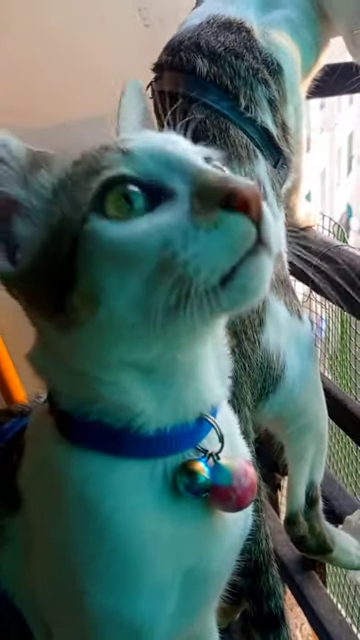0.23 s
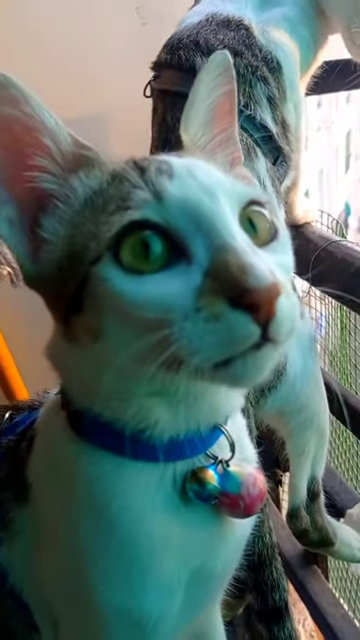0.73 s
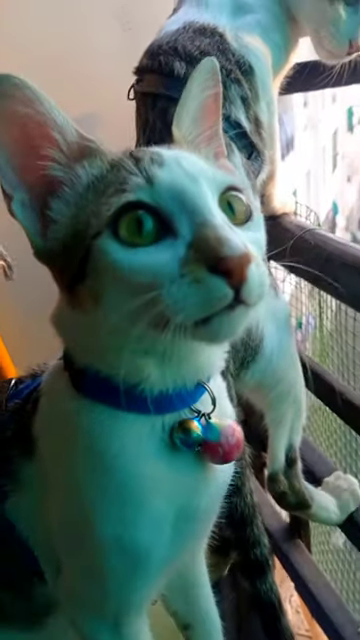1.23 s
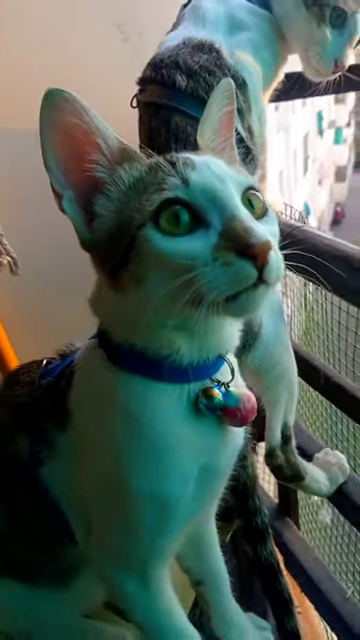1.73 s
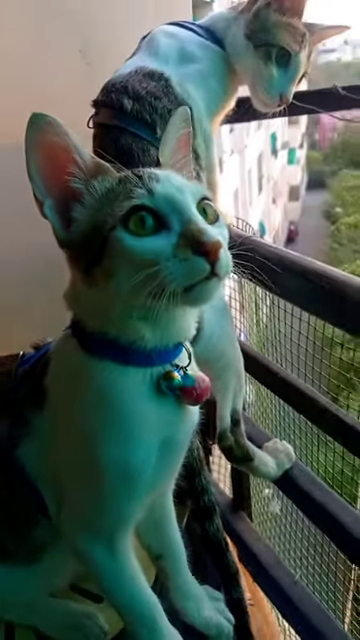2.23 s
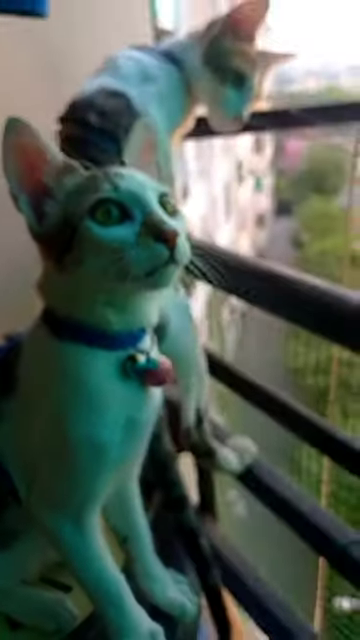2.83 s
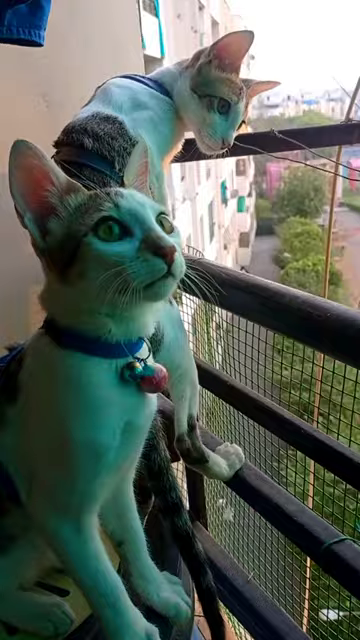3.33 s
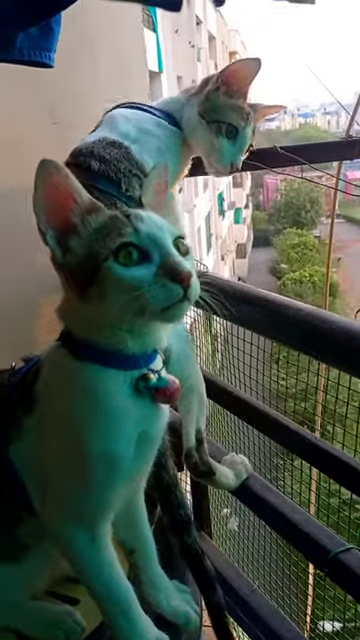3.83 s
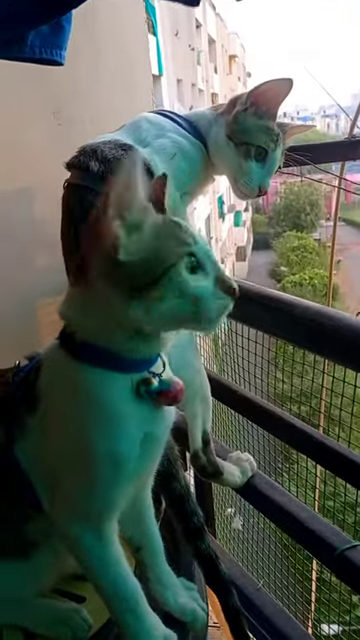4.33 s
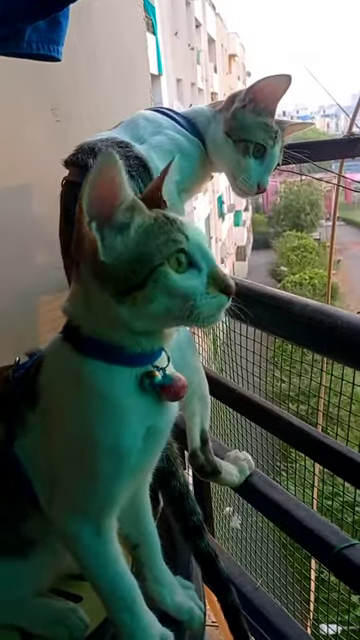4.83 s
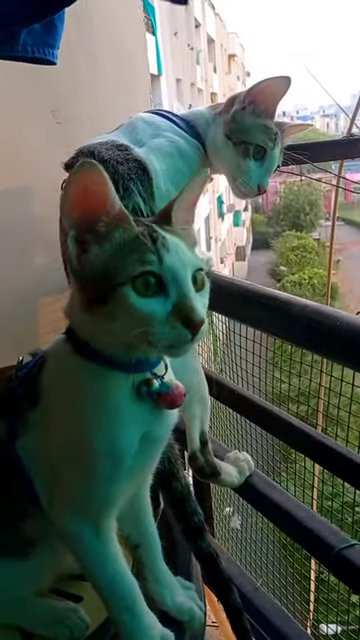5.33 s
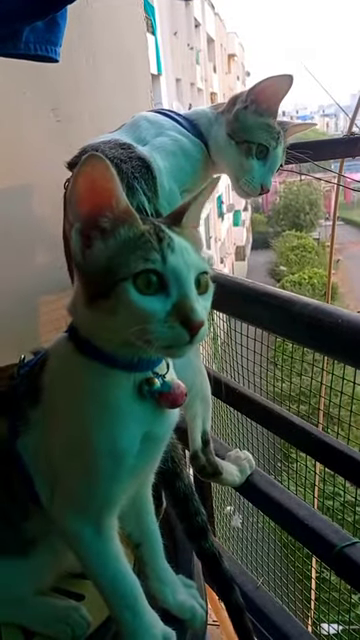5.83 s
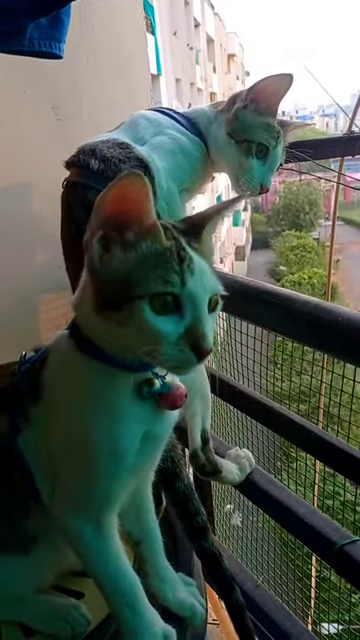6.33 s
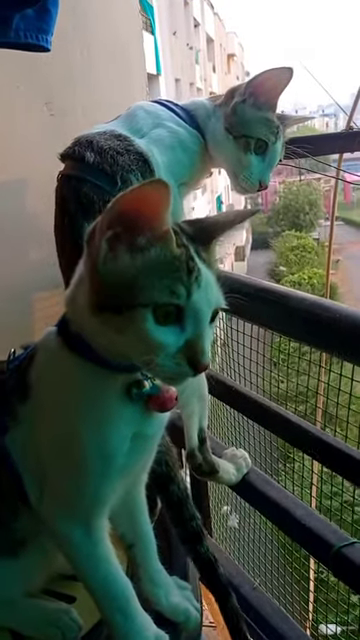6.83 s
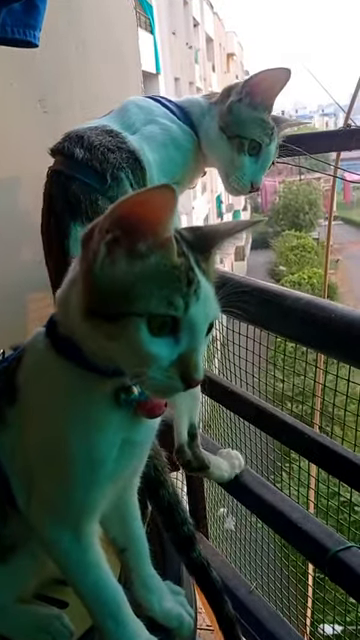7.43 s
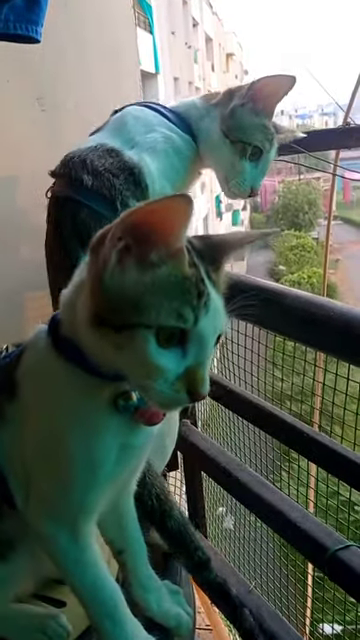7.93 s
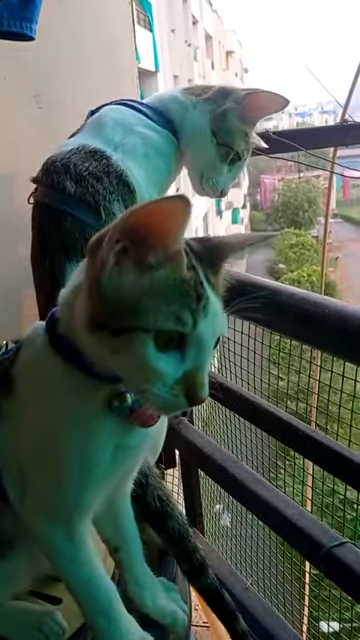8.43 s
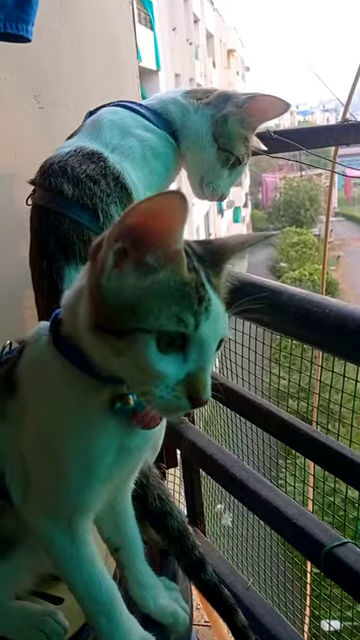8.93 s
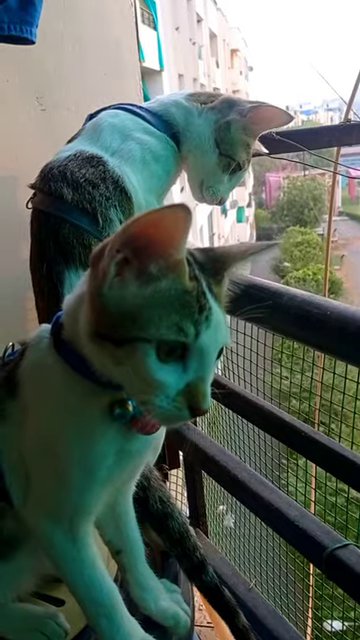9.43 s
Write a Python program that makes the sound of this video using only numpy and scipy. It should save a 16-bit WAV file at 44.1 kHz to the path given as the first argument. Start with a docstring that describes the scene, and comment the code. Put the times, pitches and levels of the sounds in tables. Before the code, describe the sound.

A lively outdoor bird chorus heard from a balcony, the two cats there silent. High paired ticks run steadily, with buzzy slurs far off, sparrow chirps in front and soft, throaty dove coos led in by small clucks. Piping gathers before a single wooden-sounding thud and rattle near the middle. Later come whistles, rasping chews and faint hoarse caws, over low traffic and patchy hiss, with sparse wall echoes.

```python
"""Birds around a high balcony

Between apartment blocks sparrows chirp close by in trilled tones, small birds tick, whistle and pipe in
bent tones, and a dove gives low falling coos. Slurs, cheeps, a pulsed crow and toots come from afar.
Something knocks once on the balcony, as ringing modes and noise; coloured noise makes the town below
and a patchy high hiss. Walls and facades return the calls as sparse echoes."""
import sys
import numpy as np
from scipy import signal
from scipy.fft import rfft, irfft
from scipy.io import wavfile
from scipy.ndimage import uniform_filter1d, map_coordinates

SR = 44100
rng = np.random.default_rng(int(sys.argv[2]) if len(sys.argv) > 2 else 0)


def generate_wav(sig):
    """Save sig (samples, or channels by samples) to the path in sys.argv[1] as 16-bit PCM at SR."""
    pcm = np.round(np.clip(np.atleast_2d(sig).T, -1, 1) * 32767).astype(np.int16)
    wavfile.write(sys.argv[1], SR, pcm)


N = 426888
TIME = np.arange(N) / SR


def from_db(db):
    """Decibels to gain."""
    return 10 ** (np.asarray(db) / 20)


def rms_one(x):
    """Scale to unit power."""
    return x / np.sqrt(np.mean(x ** 2) + 1e-20)


def add(out, start_s, sound):
    """Mix a sound in at a start time."""
    i = int(start_s * SR)
    out[i:i + len(sound)] += sound[:max(N - i, 0)]


def wander(size, rate_hz):
    """Smooth random curve through normal knots, rate_hz of them a second."""
    knots = rng.standard_normal(4096)
    return map_coordinates(knots, [np.arange(size) * rate_hz / SR], order=3, mode="wrap")


def noise(spectrum):
    """Unit-power noise coloured by rows of (Hz, dB per Hz), interpolated over log frequency."""
    hz, db = np.transpose(spectrum)
    bins_hz = np.arange(N // 2 + 1) * SR / N + 1e-6
    gain = from_db(np.interp(np.log(bins_hz), np.log(hz), db))
    return rms_one(irfft(rfft(rng.standard_normal(N)) * gain, N))


def patchy(x, depth_db, width_hz, rate_hz):
    """Every narrow band swells and fades on its own; unit power."""
    hz, t, frames = signal.stft(x, SR, nperseg=512)
    grid = np.meshgrid(hz / width_hz, t * rate_hz, indexing="ij")
    field = map_coordinates(rng.standard_normal((256, 1024)), grid, order=3, mode="wrap")
    gain = from_db(depth_db * np.tanh(field / 2) * 2)
    return rms_one(signal.istft(frames * gain, SR, nperseg=512)[1][:N])


def resonate(x, hz, width_hz):
    """Two-pole resonance with unit gain at its peak."""
    r = np.exp(-np.pi * width_hz / SR)
    zeros = np.array([1, 0, -1]) * (1 - r * r) / 2
    poles = [1, -2 * r * np.cos(2 * np.pi * hz / SR), r * r]
    return signal.lfilter(zeros, poles, x + 1e-18)


def dying(rows, t60_s):
    """Envelope that jumps at each (start s, dB) and decays exponentially."""
    kicks = np.zeros(N)
    for start_s, db in rows:
        add(kicks, start_s, from_db([db]))
    return signal.lfilter([1], [1, -from_db(-60 / (t60_s * SR))], kicks + 1e-18)


def syrinx(hz, db, overtone_db):
    """Nearly pure tone with a weak octave and soft ends, as from a bird's syrinx."""
    phase = 2 * np.pi * np.cumsum(hz) / SR
    ends = signal.windows.tukey(len(hz), min(1, .006 * SR / len(hz)))  # 3 ms each
    octave = from_db(overtone_db) * np.sin(2 * phase) * (hz < SR / 4)  # none above Nyquist
    return np.sqrt(2) * ends * from_db(db) * (np.sin(phase) + octave)


def bend(size, start, end, turn, bow):
    """Pitch ratio from start to 1 at the share turn, then to end; bow above 1 lingers at the turn."""
    u = np.linspace(0, 1, size)
    distance = np.interp(u, [0, turn, 1], [1, 0, 1]) ** bow
    return 1 + (np.where(u < turn, start, end) - 1) * distance


def note(length_s, hz, db, start=1, end=1, turn=0.69, bow=1, edge_db=0,
         waver=0, waver_hz=180, overtone_db=-60):
    """Tone along a bend with random pitch waver; edge_db is its ends relative to its middle."""
    size = int(length_s * SR)
    pitch_hz = hz * bend(size, start, end, turn, bow) * (1 + waver * wander(size, waver_hz))
    return syrinx(pitch_hz, db + edge_db * np.linspace(-1, 1, size) ** 2, overtone_db)


def sing(rows, **manner):
    """Notes of one kind from rows of (start s, length s, Hz, dB)."""
    out = np.zeros(N)
    for start_s, length_s, hz, db in rows:
        add(out, start_s, note(length_s, hz, db, **manner))
    return out


def trilled(length_s, hz, db, shape, trill_hz, jitter, overtone_db, depth_scale=1):
    """Tone following (share, pitch ratio, dB, trill depth); its uneven trill also breaks up the level."""
    size = int(length_s * SR)
    share, *columns = np.transpose(shape)
    u = np.linspace(0, 1, size)
    ratio, level_db, depth = (uniform_filter1d(np.interp(u, share, c), size=120) for c in columns)
    depth = depth * depth_scale
    trill = np.sin(2 * np.pi * np.cumsum(trill_hz * (1 + 0.187 * wander(size, 150))) / SR)
    pitch_hz = hz * ratio * (1 + depth * (trill + jitter * wander(size, 900)))
    breakup_db = 17.5 * depth * wander(size, 498.6)  # deeper trill, more broken voice
    return syrinx(pitch_hz, db + level_db + breakup_db, overtone_db)


def engines():
    """Deep drone of vehicles: low coloured noise that comes and goes."""
    # Each row: frequency in Hz, relative level in dB per Hz.
    engine_colour = [(30, -54), (60, 7.5), (90, 17.5), (135, 18.5), (180, 3), (300, -44.5)]
    # Each row: time in seconds, relative level in dB.
    engine_level = [(0, -49), (1.3, -46.5), (3.8, -55), (4.9, -53), (8.2, -55), (9.68, -53)]
    return from_db(np.interp(TIME, *np.transpose(engine_level)) + 3.0) * noise(engine_colour)


def town(town_db, hum_db, hum_hz):
    """Patchy traffic rumble and a machine drone of resonant noise."""
    # Each row: frequency in Hz, relative level in dB per Hz.
    rumble_colour = [(25, -60.5), (45, -40.5), (80, -23.5), (130, -3.5), (200, 0), (300, -2.5), (440, -3.5),
                     (800, -15.5), (1600, -23.5), (2200, -31), (4000, -39), (6500, -57), (8500, -59),
                     (11000, -67.5), (15000, -62)]
    rumble = from_db(town_db) * patchy(noise(rumble_colour), depth_db=4.0, width_hz=131.6, rate_hz=12)
    hum = resonate(resonate(rng.standard_normal(N), hum_hz, 19.6), hum_hz, 19.6)
    return rumble + from_db(hum_db) * rms_one(hum)


def patchy_hiss(level_db):
    """Patchy, flickering hiss in the birds' range: coloured noise that swells and fades."""
    # Each row: frequency in Hz, relative level in dB per Hz.
    hiss_colour = [(1800, -1.5), (2700, 1.5), (4200, 6.5), (6200, 1), (7300, -10.5), (8800, -22.5),
                   (10000, -51)]
    # Each row: time in seconds, relative level in dB.
    hiss_level = [(0, -57), (.25, -64.5), (.65, -70.5), (1.0, -56.5), (1.45, -60), (1.9, -51.5),
                  (2.6, -60.5), (3.05, -52), (3.4, -60.5), (4.2, -50.5), (4.8, -59.5), (5.3, -53.5),
                  (5.8, -58.5), (6.9, -53), (7.75, -50), (8.1, -57), (8.45, -61), (9.0, -59), (9.3, -46.5),
                  (9.52, -57), (9.68, -41.5)]
    hiss = patchy(noise(hiss_colour), depth_db=7.5, width_hz=310.0, rate_hz=22)
    return from_db(level_db + np.interp(TIME, *np.transpose(hiss_level))) * hiss


def horns():
    """Thin, unsteady toots far down the street."""
    # Each row: start in seconds, length in seconds, pitch in Hz, relative level in dB.
    toots = [(1.47, 0.037, 1243, -51), (4.3, 0.67, 1145, -60.5), (5.05, .7, 1185, -67)]
    return sing(toots, waver=0.035, waver_hz=90)


def crow():
    """Far caws: hoarse pulses at an unsteady rate through two throat resonances."""
    # Each row: start in seconds, length in seconds, relative level in dB.
    caws = [(7.009, 0.42, -59), (7.674, 0.4, -60), (8.307, 0.35, -61), (8.972, 0.45, -57)]
    # Each row: frequency in Hz, width in Hz, relative level in dB.
    throat = [(1400, 380, 11), (1620, 310, 15)]
    out = np.zeros(N)
    for start_s, length_s, db in caws:
        size = int(length_s * SR)
        arch = np.sin(np.linspace(0, np.pi, size)).clip(0)
        cycles = np.cumsum(400 * (1 + 0.14 * arch + 0.0854 * wander(size, 400))) / SR
        pulses = np.diff(np.floor(cycles), prepend=0)
        voice = sum(from_db(level_db) * resonate(resonate(pulses, hz, width_hz), hz, width_hz)
                    for hz, width_hz, level_db in throat)
        add(out, start_s, from_db(db) * rms_one(voice * np.sqrt(arch)))
    return out


def slurs(voice_db, rasp_db):
    """Buzzy falling slurs of birds farther off: a trilled voice with a raspy second one around it."""
    # Each row: start in seconds, length in seconds, reference pitch in Hz, relative level in dB.
    slur_rows = [(0.301, 0.11, 2950, -60.5), (0.603, 0.12, 2690, -65.5), (0.846, 0.12, 2610, -57.5),
                 (0.986, 0.12, 3600, -48), (1.793, 0.13, 3700, -48), (2.321, 0.093, 2730, -65),
                 (2.508, 0.12, 3640, -47), (3.174, 0.12, 3603, -44.5), (4.148, 0.11, 3590, -46),
                 (4.616, 0.039, 2234, -50.5), (5.297, 0.13, 3270, -56.5), (5.642, 0.19, 4050, -58.5),
                 (7.578, 0.083, 3390, -52), (8.69, 0.061, 2186, -57.5), (8.992, 0.054, 3080, -60.5)]
    # Each row: share of length, pitch ratio, relative level in dB, trill depth as share of pitch.
    slur_shape = [(0, 1.06, -3, .01), (.08, 1.24, 0, .012), (.25, 1.1, 2, .03), (.45, 1.03, 0, .06),
                  (.68, .89, -1, .045), (.86, .86, 1, .02), (1, .8, -7, .02)]
    out = from_db(rasp_db) * sing(slur_rows, end=0.66, turn=0.28, edge_db=-11.0, waver=0.13, waver_hz=270)
    for start_s, length_s, hz, db in slur_rows:
        add(out, start_s, trilled(length_s, hz, db + voice_db, slur_shape, trill_hz=124.4,
                                  jitter=0.83, overtone_db=-47))
    return out


def cheepers():
    """Thin, faint cheeps from the trees: short tones with wavering pitch and soft edges."""
    # Each row: start in seconds, length in seconds, pitch in Hz, relative level in dB.
    cheeps = [(.315, 0.038, 7100, -62), (.41, 0.022, 7350, -60), (.712, .02, 5900, -58),
              (.775, 0.027, 6500, -54.5), (.78, .04, 4470, -54), (.9, 0.021, 5870, -59),
              (3.45, 0.047, 4680, -54), (3.57, 0.057, 6230, -54.5), (4.27, .04, 6350, -60),
              (4.61, 0.052, 6480, -42.5), (4.96, 0.075, 5550, -43), (7.56, .05, 6260, -38),
              (7.72, 0.025, 4780, -55), (7.845, 0.038, 5670, -59), (8.165, 0.037, 6770, -56),
              (8.3, 0.039, 6270, -53), (9.22, 0.12, 5430, -50)]
    return sing(cheeps, start=.9, end=0.98, turn=.5, edge_db=-10.5, waver=.045, waver_hz=130)


def small_noises():
    """Tiny clicks and one soft brush close by, both enveloped coloured noise."""
    # Each row: start in seconds, relative level in dB.
    click_rows = [(.512, -63), (1.305, -43), (2.28, -62), (7.524, -58), (7.666, -53)]
    peak_s, peak_db, swell_db_per_s, fade_db_per_s = 1.67, -42, 184, 346
    brush_db = peak_db - np.maximum(swell_db_per_s * (peak_s - TIME), fade_db_per_s * (TIME - peak_s))
    brush = from_db(brush_db) * noise([(500, -10), (3000, 7), (7000, 16), (10000, -7), (15000, -10)])
    clicks = dying(click_rows, t60_s=0.039) * noise([(500, -15.0), (3000, -6.0), (8000, 10), (15000, -13)])
    return clicks + brush


def knock(ring_db, crack_db, crack_t60_s):
    """A dull blow and its rattle: noise bursts and decaying modes of the struck body."""
    # Each row: start in seconds, relative strength in dB.
    blows = [(4.047, -4.5), (4.081, 9), (4.086, -6.5), (4.107, -28)]
    # Each row: frequency in Hz, relative level in dB, 60 dB decay time in seconds.
    modes = [(217, -20.5, 0.79), (444, -17, 0.15), (695, -8.5, 0.13), (950, -30.5, 0.41), (1120, -13, 0.18),
             (1270, -25, 0.056), (1730, -6.5, 0.025), (2420, -21, .08), (2760, -19, 0.072)]
    # Each row: frequency in Hz, relative level in dB per Hz.
    crack_colour = [(71, -42), (120, -19), (418, -3), (633, -22), (706, -9.5), (1210, -13), (1460, -9.5),
                    (1840, -21.5), (2890, -23.5), (6530, -39.5), (9040, -49.5), (11800, -68), (19900, -120)]
    out, t = np.zeros(N), TIME[:SR // 2]
    for start_s, db in blows:
        for hz, level_db, t60_s in modes:
            decay_db = ring_db + db + level_db + rng.normal(0, 1.2) - 60 * t / t60_s
            add(out, start_s, from_db(decay_db) * np.sin(2 * np.pi * hz * t) * rng.choice([-1, 1]))
    return out + from_db(crack_db) * dying(blows, crack_t60_s) * noise(crack_colour)


def pipers():
    """Clean lower tones that hold, lift, sag or glide down; their level flickers."""
    # Each row of the four: start in seconds, length in seconds, pitch in Hz, relative level in dB.
    pipes = [(3.21, 0.066, 3070, -49.5), (3.362, 0.072, 3055, -47.5), (3.565, 0.063, 3050, -46),
             (3.705, 0.053, 3040, -46.5), (3.79, 0.052, 2586, -48), (3.928, 0.071, 2988, -44),
             (4.315, 0.06, 2980, -41.5), (4.46, 0.08, 2944, -47.5), (9.33, 0.074, 2685, -57),
             (9.49, 0.036, 3300, -52)]  # level piping
    lifts = [(2.76, 0.07, 3620, -51.5), (3.132, 0.058, 3580, -47.5), (3.535, 0.052, 3560, -47),
             (8.47, 0.04, 2625, -54.5)]  # lift into their pitch
    sags = [(2.523, 0.038, 2390, -48.5), (3.62, 0.08, 2570, -47), (4.0, 0.11, 2496, -51),
            (4.385, 0.052, 2540, -47), (8.822, 0.048, 2367, -47)]  # fall, linger in the middle, then fall again
    glides = [(1.87, 0.071, 2580, -62), (2.36, .11, 2430, -62.5), (2.83, 0.047, 2520, -53.5),
              (2.865, 0.082, 2630, -54), (3.205, 0.09, 2250, -53.5), (9.6, 0.08, 2910, -56)]  # thin, falling
    notes = sing(pipes, start=0.99, end=0.97, bow=1.46, edge_db=-4, waver=0.005)
    notes += sing(lifts, start=.87, end=1.04, bow=1.2, edge_db=-10.5, waver=0.012)
    notes += sing(sags, start=1.07, end=0.93, turn=0.45, bow=2.3, edge_db=4, waver=0.0043)
    notes += sing(glides, start=1.17, end=0.77, edge_db=5, waver=0.024)
    return notes * from_db(4 * (wander(N, 70) - 1))


def whistlers():
    """Thin high bent tones: rises that end in a quick flick down from above, and arched peeps."""
    # Each row of both: start in seconds, length in seconds, pitch in Hz, relative level in dB.
    rises = [(1.604, 0.071, 4800, -48.5), (2.297, 0.053, 4740, -46), (2.582, 0.086, 4590, -52),
             (7.099, 0.078, 4880, -48), (7.311, 0.061, 4870, -46.5), (7.476, 0.067, 5380, -48.5),
             (9.218, 0.086, 5600, -48.5)]
    peeps = [(1.35, 0.028, 5900, -50), (1.505, 0.027, 5680, -51), (2.003, 0.033, 6230, -48),
             (2.2, 0.014, 5730, -42.5), (5.915, 0.032, 6400, -51.5), (6.72, 0.02, 6190, -51),
             (6.83, 0.042, 6060, -50), (9.59, 0.043, 5970, -50.5)]
    gap_s, flick_s, flick_hz, flick_db = 0.017, 0.035, 6020, 0.5
    flicks = [(start_s + length_s + gap_s, flick_s, flick_hz, db + flick_db)
              for start_s, length_s, hz, db in rises]
    out = sing(rises, start=.88, end=1.13, edge_db=0.5, waver=0.0042)
    out += sing(flicks, start=1.14, end=0.23, edge_db=-27, waver=0.034)
    return out + sing(peeps, start=0.85, end=0.55, bow=3.8, edge_db=7, waver=0.035)


def tick(top_hz, db, stretch):
    """Pitch whip up by about an octave, a moment on top, a fall and a short rest below."""
    low_hz, rise_s, hold_s, fall_s, rest_s = 3888, .007, 0.0053, 0.0087, 0.004  # times before stretch
    corners_s = stretch * np.cumsum([0, rise_s, hold_s, fall_s, rest_s])
    t = np.arange(0, corners_s[-1], 1 / SR)
    height = uniform_filter1d(np.interp(t, corners_s, [0, 1, 1, 0, 0]), size=100)
    hz = (low_hz + (top_hz - low_hz) * height) * (1 + 0.02 * wander(len(height), 386))
    sweep_db = -4.5 * np.sin(np.pi * height)  # softer while the pitch moves
    return syrinx(hz, db + sweep_db + 3.8 * wander(len(height), 484), overtone_db=-49)


def ticker(snap_db):
    """Sharp ticks of varied length: a noise snap and a rough low voice open each, then the whip follows."""
    # Each row: start in seconds, top pitch in Hz, relative level in dB.
    tick_rows = [(0.06, 8320, -30.5), (0.5, 8800, -33.5), (1.096, 8920, -34), (1.195, 8100, -33),
                 (1.615, 8880, -34), (1.705, 7730, -32.5), (2.175, 8950, -32), (2.27, 7900, -34.5),
                 (2.686, 9260, -33.5), (3.093, 8970, -31), (3.196, 7860, -31.5), (3.752, 8600, -30.5),
                 (3.846, 7740, -32), (4.335, 8280, -32), (4.415, 7700, -30), (4.907, 8570, -32),
                 (4.985, 7930, -32), (5.084, 7640, -32), (5.382, 8300, -31.5), (5.451, 7760, -30),
                 (5.95, 8820, -32), (6.346, 8070, -32), (6.42, 7700, -30.5), (6.854, 8160, -26),
                 (6.919, 7700, -27), (6.984, 7420, -26.5), (7.38, 7740, -30), (7.446, 7670, -27.5),
                 (7.976, 7760, -33.5), (8.039, 7600, -31.5), (8.573, 8470, -41), (8.654, 7800, -33.5),
                 (9.111, 8500, -38.5), (9.19, 7650, -30.5)]
    # Each row: frequency in Hz, relative level in dB per Hz.
    snap_colour = [(1000, -30), (2500, -2), (4200, 2.5), (8000, -2.5), (10000, -24), (15000, -40)]
    whip_delay_s, undertone_s, undertone_hz, undertone_db = 0.0026, .013, 3680, -2
    out = np.zeros(N)
    for start_s, top_hz, db in tick_rows:
        add(out, start_s + whip_delay_s, tick(top_hz, db, stretch=rng.uniform(.85, 1.15)))
        low_hz = undertone_hz * rng.uniform(.94, 1.2)
        add(out, start_s, note(undertone_s, low_hz, db + undertone_db, edge_db=6, waver=0.071, waver_hz=760))
    snaps = dying([(start_s, db) for start_s, _, db in tick_rows], t60_s=0.068) * noise(snap_colour)
    return out + from_db(snap_db) * signal.sosfilt(signal.butter(4, 7000, fs=SR, output="sos"), snaps)


def dove():
    """Falling coos: smooth ones quaver in pitch and level, rough ones flutter; clucks lead most in."""
    # Each row: start in seconds, length in seconds, start, middle and end pitch in Hz, bow (1 falls
    # straight, more lingers in the middle), relative level in dB, roughness (about 0-1), attack in
    # seconds, swell of the middle over the ends in dB.
    coo_rows = [(0.39, 0.48, 562.4, 359.8, 286.4, 3.2, -21, 0.18, 0.086, 4.5),
                (2.329, 0.47, 503.7, 371.5, 256.5, 1.82, -23, 0.4, 0.017, 4.5),
                (4.269, 0.45, 442.7, 352.2, 250, 2.08, -25.5, 0.2, 0.034, 2.5),
                (6.185, .43, 550.6, 409.8, 295.3, 1.05, -19.5, 0.55, 0.015, 6.5),
                (8.405, 0.41, 455.4, 404.6, 301, 1.19, -24.5, 1.03, 0.078, 3)]
    # Brief level dips. Each row: time in seconds, half width in seconds, depth in dB.
    level_dips = [(.497, 0.021, -21), (2.591, 0.016, -19), (2.69, 0.02, -9)]
    # Each row: start in seconds, length in seconds, pitch in Hz, relative level in dB.
    clucks = [(0.138, 0.022, 334, -27.5), (1.811, 0.029, 445, -34.5), (2.098, 0.033, 345, -30),
              (4.006, 0.026, 406, -26), (4.102, 0.039, 419, -29.5), (5.619, 0.031, 446, -37.5),
              (5.909, 0.017, 327, -27.5), (5.99, 0.026, 376, -29.5)]
    release_s, edge_db, flutter_hz = 0.061, -7.5, 41.65
    quaver_period_s, quaver_peak_s, quaver_depth, quaver_db = 0.1404, 0.2476, 0.019, -1.5
    split_roughness, split_ratio, split_db = 0.54, 1.21, 5
    out = np.zeros(N)
    for (start_s, length_s, start_hz, middle_hz, end_hz, bow, db,
         roughness, attack_s, swell_db) in coo_rows:
        t = np.arange(0, length_s, 1 / SR)
        size = len(t)
        edges_db = edge_db * np.maximum(1 - t / attack_s, 1 - (length_s - t) / release_s).clip(0)
        rough = roughness * (1 - 0.76 * np.linspace(-1, 1, size) ** 2)  # most in the middle
        quaver = (1 - roughness) * np.cos(2 * np.pi * (t - quaver_peak_s) / quaver_period_s)
        flutter = np.sin(2 * np.pi * np.cumsum(flutter_hz * (1 + 0.259 * wander(size, 34.6))) / SR)
        hz = middle_hz * bend(size, start_hz / middle_hz, end_hz / middle_hz, turn=.48, bow=bow)
        hz = hz * (1 + quaver_depth * quaver + 0.11 * rough * wander(size, 128.8))
        arch_db = -swell_db * np.abs(2 * t / length_s - 1)
        tone = syrinx(hz, db + arch_db + edges_db + quaver_db * quaver, overtone_db=-28.5)
        # rougher coos split off a higher voice, strongest at the start
        split = from_db(split_db) * max(roughness - split_roughness, 0) * (1 - t / length_s)
        tone = tone + split * syrinx(split_ratio * hz, db + edges_db, overtone_db=-40)
        add(out, start_s, tone * (1 + rough * flutter) / np.sqrt(1 + rough ** 2 / 2))
    out = out * from_db(sum(db * np.exp(-((TIME - dip_s) / width_s) ** 2)
                            for dip_s, width_s, db in level_dips))
    return out + from_db(0.5) * sing(clucks, end=0.76, edge_db=12.0, waver=0.021, overtone_db=-22.0)


def sparrows(second_voice_db, air_db):
    """Chirrups are two warbled arches and a closing note, chews rasp downward; air noise follows both."""
    # Each row: start in seconds, length in seconds, reference pitch in Hz, relative level in dB, closing
    # note's delay in seconds, its pitch in Hz, its level relative to the call in dB, warble depth factor.
    chirrups = [(1.127, 0.085, 5960, -19, 0.1, 5180, -10.5, 1.5),
                (2.717, 0.084, 5830, -22, 0.1, 5530, -2, 1.5),
                (3.683, .098, 5834, -20.5, .111, 5427, 0.5, 1.37),
                (5.125, 0.094, 5980, -17.5, 0.1, 5180, -6.5, 1.9)]
    # Each row: start in seconds, length in seconds, reference pitch in Hz, relative level in dB.
    chews = [(4.433, .125, 4000, -23), (6.599, 0.12, 3983, -21.5), (8.534, .132, 3913, -22.5)]
    # Each row of the four: share of length, pitch ratio, relative level in dB, trill depth as share of pitch.
    chirrup_shape = [(0, .8, -18, .02), (.08, .97, -8, .02), (.16, 1.05, -2, .008), (.33, 1.0, 0, .005),
                     (.43, .88, -5, .012), (.5, .83, -8, .012), (.56, .98, -3, .015), (.64, 1.02, 1, .008),
                     (.77, .99, 3, .005), (.89, .92, -4, .02), (1, .84, -8, .02)]
    closing_shape = [(0, .74, -8, .015), (.3, .76, -6, .03), (.41, .99, -2, .01), (.85, 1, 1, .003),
                     (1, 1, -3, .004)]
    chew_shape = [(0, 1.62, -17, .05), (.15, 1.53, -10, .08), (.22, 1.22, -8, .08), (.26, 1.13, 1, .012),
                  (.33, 1.11, 3, .012), (.38, .95, -4, .04), (.44, 1.02, 0, .1), (.53, .92, -9, .1),
                  (.57, .86, -3, .09), (.61, .96, 0, .12), (.69, 1.13, -3, .11), (.75, .96, -1, .08),
                  (.8, .91, 4, .04), (.9, .86, -1, .09), (1, .82, -6, .1)]
    undertone_shape = [(0, 0.86, -25, .05), (.5, 1.02, -6.5, 0.049), (1, 1.5, -14, .04)]
    # Each row: frequency in Hz, relative level in dB per Hz.
    air_colour = [(1500, -24.5), (4000, 4.5), (6000, 11), (7500, 3), (10000, -11), (12500, -19),
                  (14000, -34), (15000, -16)]
    warble_hz, rasp_hz, closing_s, opening_s = 430, 176.2, 0.037, 0.017
    undertone_onset, undertone_share = 0.079, 0.084  # shares of the chew
    out = np.zeros(N)
    for start_s, length_s, hz, db, delay_s, closing_hz, closing_db, warble in chirrups:
        add(out, start_s, trilled(length_s, hz, db, chirrup_shape, warble_hz, jitter=1.13,
                                  overtone_db=-39.5, depth_scale=warble))
        # the second side of the syrinx rasps faintly below, strongest as the call opens
        side_db = db + second_voice_db
        add(out, start_s, note(length_s, .8 * hz, side_db - 12.5, waver=0.08, waver_hz=700))
        add(out, start_s, note(opening_s, 0.89 * hz, side_db, waver=0.035, waver_hz=540))
        add(out, start_s + delay_s, trilled(closing_s, closing_hz, db + closing_db, closing_shape, warble_hz,
                                            jitter=0.44, overtone_db=-39.5, depth_scale=warble))
    for start_s, length_s, hz, db in chews:
        add(out, start_s, trilled(length_s, hz, db, chew_shape, rasp_hz, jitter=.35, overtone_db=-32))
        # a lower second voice near the opening
        undertone = trilled(undertone_share * length_s, hz, db + 4.5, undertone_shape, rasp_hz,
                            jitter=1.0, overtone_db=-25)
        add(out, start_s + undertone_onset * length_s, undertone)
    spurts = uniform_filter1d(np.abs(out), size=60) * from_db(4.5 * wander(N, 180))
    return out + from_db(air_db) * spurts * patchy(noise(air_colour), depth_db=5, width_hz=1000, rate_hz=70)


def recess(x):
    """Ringing of the balcony at a few low resonances."""
    # Each row: frequency in Hz, width in Hz, relative level in dB.
    recess_modes = [(434.3, 26.7, -1), (372, 12, -27), (307, 20, -9.5)]
    return sum(from_db(db) * resonate(x, hz, width_hz) for hz, width_hz, db in recess_modes)


def balcony(x, hardness):
    """Direct sound plus first reflections from ceiling, floor and walls as delayed copies."""
    # Each row: delay in seconds, gain before hardness.
    walls = [(.0047, 0.3), (0.0099, 0.43), (0.016, .33), (.026, 0.41)]
    return x + hardness * sum(gain * np.interp(TIME - delay_s, TIME, x, left=0) for delay_s, gain in walls)


def tail(x, t60_s, wet_db, per_s):
    """Sparse random echoes from railings and facades that build up quickly and die away."""
    t = TIME[:SR]
    arrivals = (rng.random(SR) < per_s / SR) * rng.standard_normal(SR)
    echoes = arrivals * from_db(-60 * t / t60_s) * (1 - np.exp(-t / 0.0013))
    return from_db(wet_db) * signal.fftconvolve(x, echoes / np.linalg.norm(echoes))[:N]


def scene():
    """Each group of sources with its own direct sound, reflections and echoes, over the background."""
    background = engines() + town(town_db=-39.5, hum_db=-45.0, hum_hz=136.4) + patchy_hiss(level_db=0.5)

    far = slurs(voice_db=-0.5, rasp_db=-5.5) + crow() + horns() + from_db(-5) * cheepers()
    distant = from_db(4) * far + tail(far, t60_s=0.24, wet_db=4.5, per_s=580)
    ticks = from_db(-13.0) * ticker(snap_db=-0.5)
    distant += from_db(-1.0) * balcony(ticks, hardness=0.79)
    distant += tail(ticks, t60_s=0.14, wet_db=-3.5, per_s=900) + tail(ticks, t60_s=0.25, wet_db=0, per_s=3000)

    blow = knock(ring_db=-23.0, crack_db=-29.5, crack_t60_s=0.19)
    blow = signal.sosfilt(signal.butter(6, 8000, fs=SR, output="sos"), blow)
    coos = dove()
    low = blow + from_db(-7.5) * coos + recess(coos)
    close = balcony(low, hardness=0.079) + tail(low, t60_s=0.72, wet_db=-8.0, per_s=870) + small_noises()

    piping = from_db(6.0) * pipers()
    near = piping + tail(piping, t60_s=0.51, wet_db=2.0, per_s=900)
    whistles = from_db(3.5) * whistlers()
    near += from_db(1.5) * balcony(whistles, hardness=0.7)
    near += tail(whistles, t60_s=0.45, wet_db=4.0, per_s=1500)
    chirps = from_db(-6.0) * sparrows(second_voice_db=-8.5, air_db=-30)
    near += balcony(chirps, hardness=0.085)
    near += tail(chirps, t60_s=0.083, wet_db=3, per_s=900) + tail(chirps, t60_s=0.51, wet_db=-7, per_s=1200)
    return (background + distant + close + near)[None]


def record(dry):
    """High-pass at 42 Hz and steep low-pass at 15.5 kHz."""
    thinned = signal.sosfilt(signal.butter(2, 42, "high", fs=SR, output="sos"), dry)
    return signal.sosfilt(signal.ellip(10, .1, 90, 15500, fs=SR, output="sos"), thinned)


dry = scene()
out = record(dry)
generate_wav(out)
```